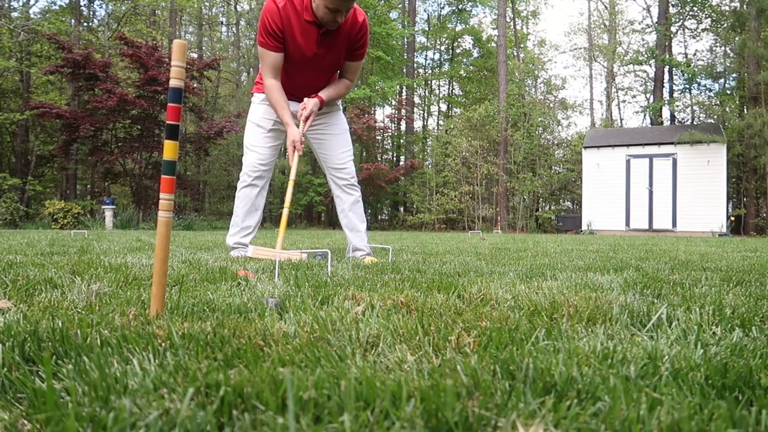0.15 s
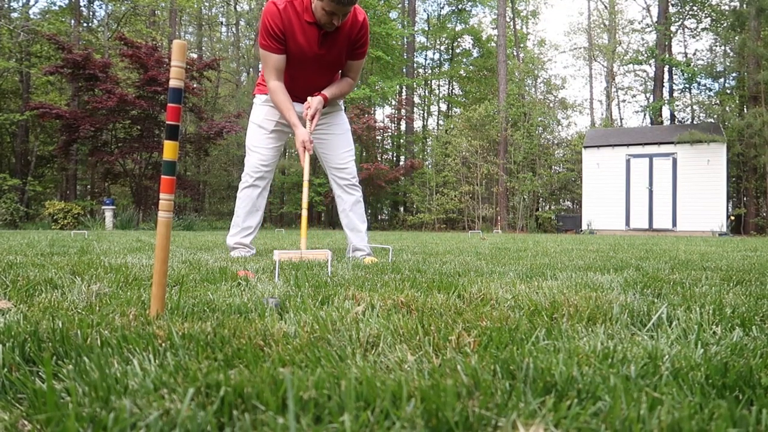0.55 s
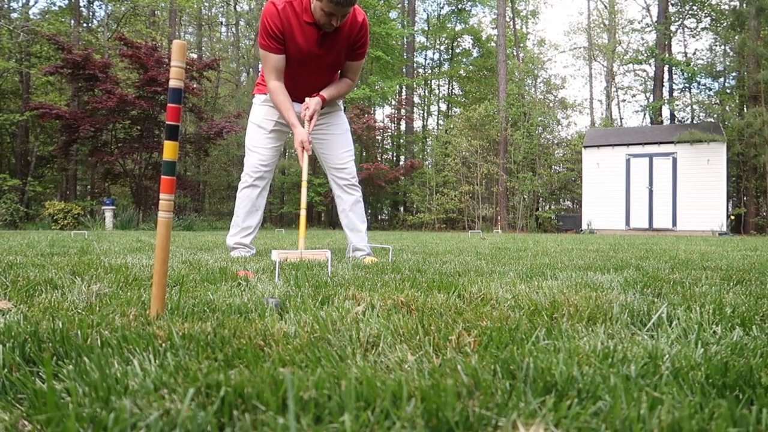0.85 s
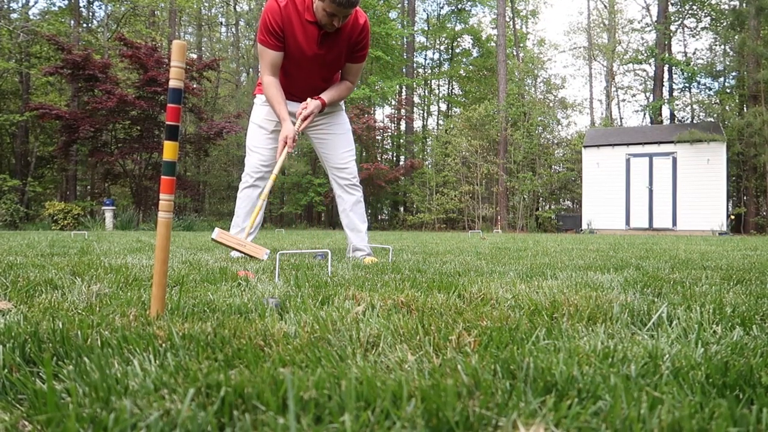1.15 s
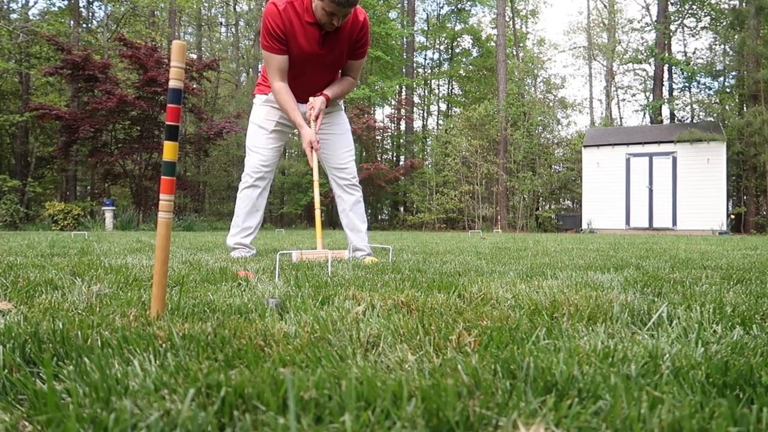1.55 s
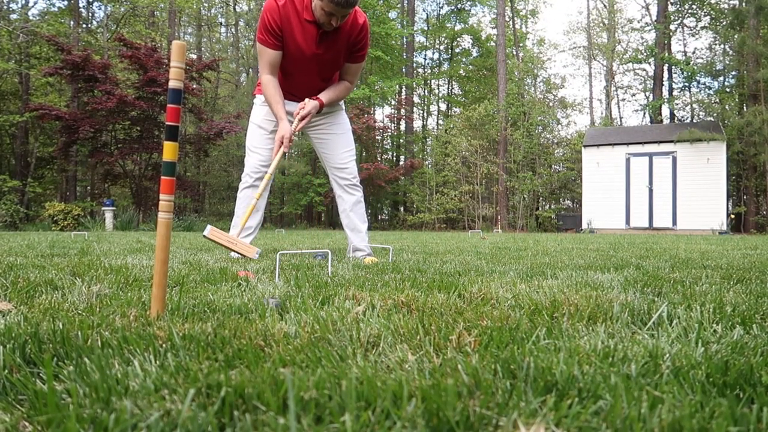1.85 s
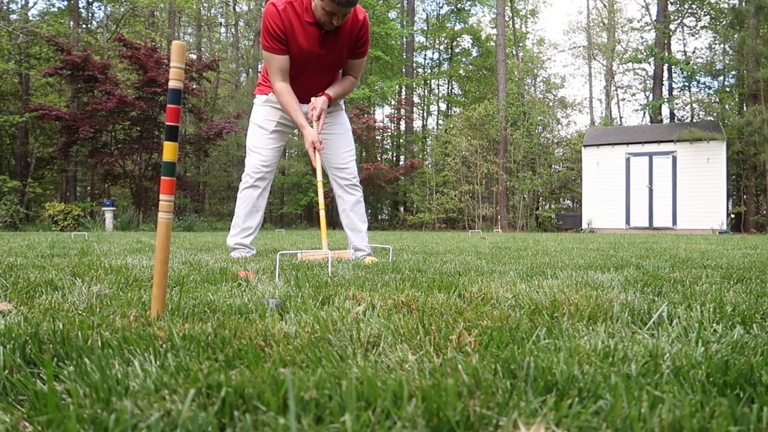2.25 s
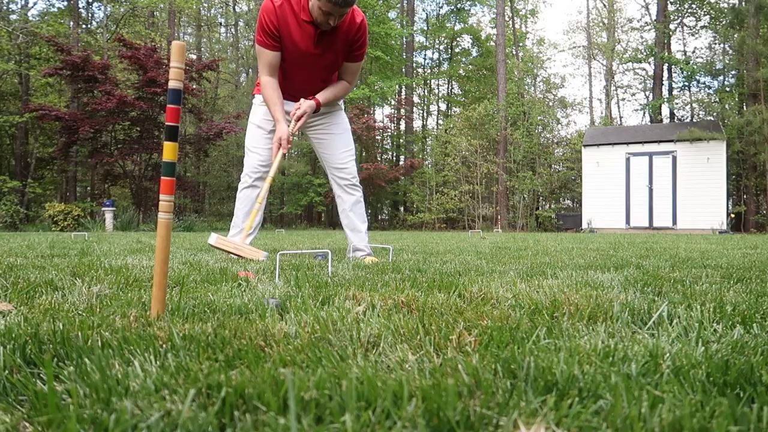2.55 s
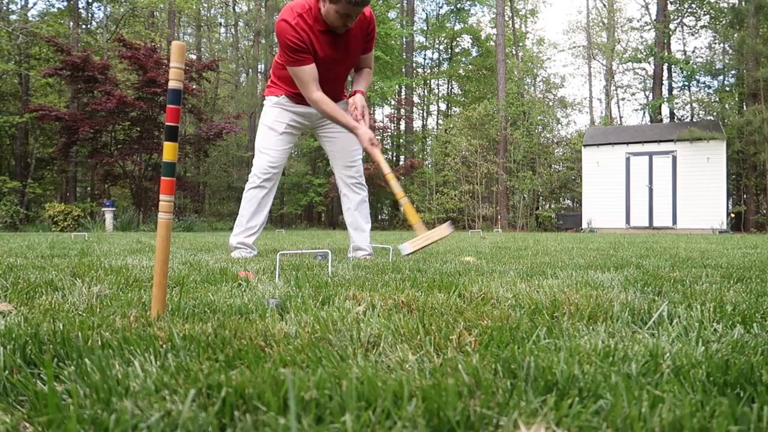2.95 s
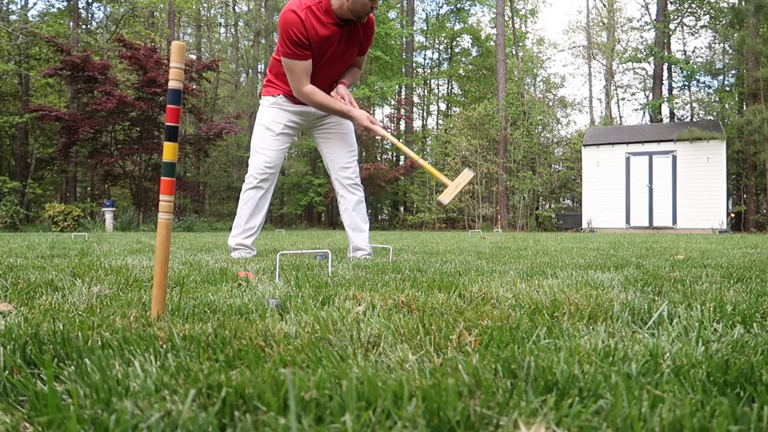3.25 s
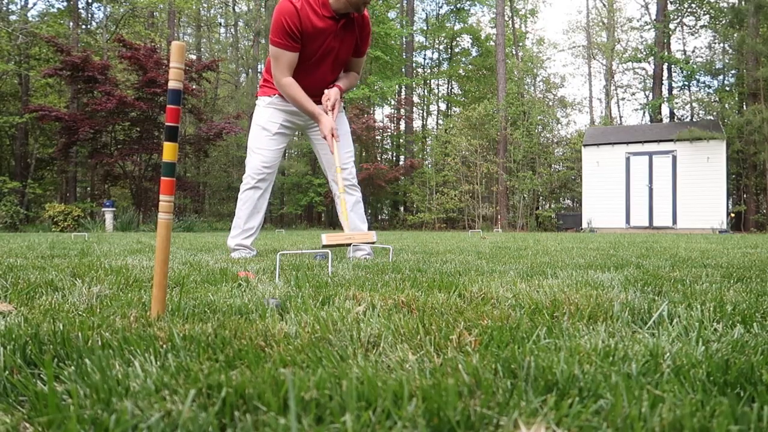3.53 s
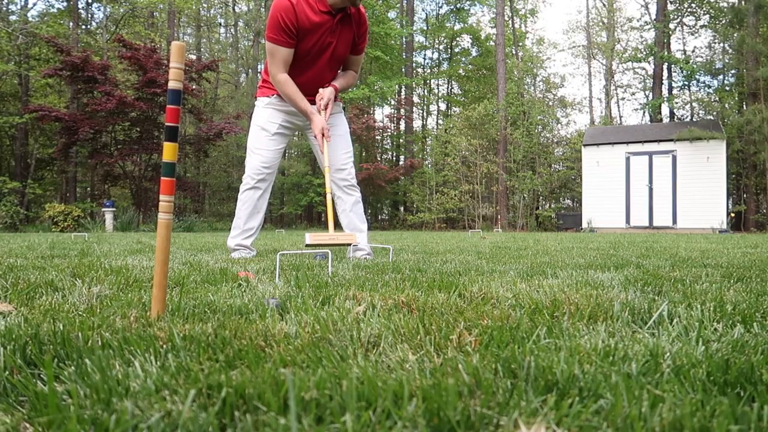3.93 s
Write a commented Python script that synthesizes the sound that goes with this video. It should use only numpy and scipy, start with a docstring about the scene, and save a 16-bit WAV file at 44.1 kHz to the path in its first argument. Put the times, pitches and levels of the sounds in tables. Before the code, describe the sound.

A quiet leafy backyard with faint birdsong, then one sharp wooden mallet knock on a ball, a dull echo, and soft turf thuds.

```python
"""Croquet knock among tall trees

A wooden mallet strikes a ball once: damped wood modes under a crack of bright noise, overloading the microphone.
The surroundings throw the knock back as dull clouds of echoes; the ball drops with short thuds and a grass crunch.
Two small birds repeat phrases of bending tones, and one deeper in the wood calls early on.
Below lie faint brushes of noise, a hush of leaves and a distant rumble, both shaped from noise."""
import sys
import numpy as np
from scipy import signal
from scipy.fft import rfft, irfft
from scipy.io import wavfile

SR = 44100
rng = np.random.default_rng(int(sys.argv[2]) if len(sys.argv) > 2 else 0)


def waveform_to_disk(signal):
    """Save audio, clipped to [-1, 1], as 16-bit WAV at the path in sys.argv[1]."""
    frames = np.transpose(np.atleast_2d(signal))
    scaled = np.clip(frames, -1, 1) * 32767
    samples = np.round(scaled).astype(np.int16)
    wavfile.write(sys.argv[1], SR, samples)


N = 180369
TIME = np.arange(N) / SR


def from_db(db):
    """Decibels to gain."""
    return 10 ** (np.asarray(db) / 20)


def rms_one(x):
    """Scale to rms 1."""
    return x / np.sqrt(np.mean(x ** 2) + 1e-20)


def at_hz(points, hz):
    """Read a spectrum on a log-frequency axis."""
    f, value = np.transpose(points)
    return np.interp(np.log(np.maximum(hz, 1)), np.log(f), value)


def cut(x, hz, kind="low", order=2):
    """Butterworth low- or high-pass."""
    sos = signal.butter(order, min(hz, .45 * SR), kind, fs=SR, output="sos")
    return signal.sosfilt(sos, x + 1e-18)


def click(s):
    """A unit impulse at time s."""
    return 1. * (np.arange(N) == round(s * SR))


def ring(force, hz, t60):
    """A damped mode: a unit click sets a sine of height 1 ringing, down 60 dB after t60 seconds."""
    decay = from_db(-60 / (t60 * SR))
    w = 2 * np.pi * hz / SR
    return signal.lfilter([0, np.sin(w)], [1, -2 * decay * np.cos(w), decay * decay], force + 1e-18)


# How alike the two microphones hear diffuse noise.
# Each row: frequency in Hz, left-right likeness (1 is identical, below 0 plays as 0).
MIC_LIKENESS = [(60, 0.99), (130, 1), (290, 0.58), (640, -0.4), (1410, -0.09), (3100, -0.02), (6820, -0.09),
                (15000, -0.03)]


def stereo_noise(size):
    """White noise at two close microphones, alike in the bass and less so in the treble."""
    mid, side = rfft(rng.standard_normal((2, size)))
    alike = np.clip(at_hz(MIC_LIKENESS, np.fft.rfftfreq(size, 1 / SR)), 0, 1)
    shared = np.sqrt((1 + alike) / 2) * mid
    opposed = np.sqrt((1 - alike) / 2) * side * [[1], [-1]]
    return irfft(shared + opposed, size)


def scattered(x, reflectors):
    """Each group of reflectors returns a dull cloud of echoes that swells and dies."""
    response = 0
    for delay, level_db, rise, t60, edge_hz, width in reflectors:
        age = np.maximum(TIME[:SR] - delay, 0)
        shape = (1 - np.exp(-age / rise)) * from_db(-60 * age / t60)
        mid, side = rng.standard_normal((2, SR)) * shape / np.linalg.norm(shape)
        cloud = mid + width * side * [[1], [-1]]
        response = response + from_db(level_db) * cut(cloud, edge_hz)
    return signal.fftconvolve(x[None], response, axes=1)[:, :N]


def placed(pair, pan_db, lead_s):
    """A source to one side is louder and earlier in the nearer microphone (positive is left)."""
    hz = np.fft.rfftfreq(N, 1 / SR)
    side = np.array([[.5], [-.5]])
    advance = np.exp(2j * np.pi * hz * side * lead_s)
    return irfft(rfft(pair) * from_db(side * pan_db) * advance, N)


# Ringing modes of mallet head and ball.
# Each row: frequency in Hz, relative strength in dB, t60 in seconds.
WOOD_MODES = [(570, -5.5, 0.011), (764, -7, 0.025), (890, -2, 0.012), (1276, -8.5, 0.023),
              (1448, -9, 0.028), (1936, -10, 0.0187), (2027, -16.5, 0.046), (2652, -4, 0.023),
              (3030, -23.5, 0.029), (3350, -9, 0.0057), (4170, -19, 0.036), (5180, -19, 0.015),
              (5970, -17.5, .016), (7300, -16.5, 0.011), (8300, -19.5, 0.016), (9600, -18.5, 0.013),
              (13500, -10.5, .011)]
HIT_S, REBOUND_DELAY_S = 3.0135, .00285
PUSH_DB, PUSH_SOFT_HZ = 0, 5700   # a softer contact has a lower treble edge
REBOUND_DB, REBOUND_SOFT_HZ = -9, 3100


def knock(level_db=2.0, crack_db=-13, crack_t60_s=.028, crack_low_hz=3000, crack_top_hz=8900, radiate_hz=300):
    """Wood meets ball: a push and its rebound ring the modes briefly under a bright crack."""
    push = from_db(PUSH_DB) * cut(click(HIT_S), PUSH_SOFT_HZ, order=1)
    rebound = from_db(REBOUND_DB) * cut(click(HIT_S + REBOUND_DELAY_S), REBOUND_SOFT_HZ, order=1)
    body = np.zeros(N)
    for k, (hz, db, t60) in enumerate(WOOD_MODES):
        swing = (-1) ** k   # neighbouring modes swing in opposite directions
        body += swing * from_db(db) * ring(rebound - push, hz, t60)
    body = cut(body, radiate_hz, "high")   # a small body radiates little bass
    age = TIME - HIT_S
    crack_fade = (age > 0) * from_db(crack_db - 60 * np.abs(age) / crack_t60_s)
    crack = cut(stereo_noise(N), crack_low_hz, "high") * crack_fade
    crack = cut(crack, crack_top_hz, order=1)
    return from_db(level_db) * (body + crack + knock_echoes(body, push))


# Reflecting surroundings of the lawn.
# Each row: delay in seconds, relative level in dB, rise in seconds, t60 in seconds, treble edge in Hz,
# stereo width from 0 to 1.
LAWN_REFLECTORS = [(.006, -9, 0.0035, 0.079, 2630, 0.18), (0.024, -19.5, 0.0048, 0.72, 5450, 0.26),
                   (0.034, -25, .0004, 0.011, 1800, 0.1), (0.102, -25, .012, .22, 4500, 0),
                   (.295, -38, 0.0039, 0.16, 1800, 0)]


def knock_echoes(body, push, ring_out_db=-5, thock_db=27, thock_low_hz=450, thock_top_hz=1300):
    """Each direction hears other modes loudest, so in the echoes they blur into one broad thock."""
    thock = cut(cut(push, thock_low_hz, "high"), thock_top_hz, order=1)
    return scattered(from_db(ring_out_db) * body + from_db(thock_db) * thock, LAWN_REFLECTORS)


# The ball drops on the turf and skips on. Each row: time in seconds, relative strength in dB.
LANDINGS = [(3.1096, -26), (3.119, -35), (3.141, -35.5), (3.335, -38.5)]
# Thud of the ball on turf. Each row: frequency in Hz, relative strength in dB, t60 in seconds.
TURF_MODES = [(282, -18, 0.041), (373, 1.5, 0.031), (587, -12, 0.017)]


def ball(soft_hz=1300, grass_db=4, grass_t60_s=0.067, grass_low_hz=220, grass_top_hz=1000):
    """Soft turf gives a low, short thud, and the blades crunch dully under it."""
    landings = cut(sum(from_db(db) * click(s) for s, db in LANDINGS), soft_hz)
    thuds = sum(from_db(db) * ring(landings, hz, t60) for hz, db, t60 in TURF_MODES)
    crushing = np.zeros(N)
    for s, db in LANDINGS:
        crushing += (TIME > s) * from_db(db - 60 * np.abs(TIME - s) / grass_t60_s)
    blades = cut(cut(crushing * rng.standard_normal(N), grass_low_hz, "high"), grass_top_hz)
    return thuds + from_db(grass_db) * blades


def whistle(notes, waver=0.013, waver_hz=150):
    """Each note is a near-pure tone that bends through three pitches and wavers a little."""
    out = np.zeros(N)
    wobble = 1 + waver * rms_one(cut(rng.standard_normal(N), waver_hz))
    for s, length, first, middle, last, db in notes:
        on = (TIME >= s) & (TIME < s + length)
        u = (TIME[on] - s) / length   # progress through the note, 0 to 1
        bend = np.polyfit([0, .5, 1], [first, middle, last], 2)
        hz = np.polyval(bend, u) * wobble[on]
        out[on] += from_db(db) * np.sin(np.pi * u) * np.sin(2 * np.pi * np.cumsum(hz) / SR)
    return out


def song(phrases, notes):
    """The same phrase again and again, louder or softer: rows of notes in absolute time."""
    return [(start + s, *shape, level + db) for start, level in phrases for s, *shape, db in notes]


# Trunks and leaves that echo the birdsong.
# Each row: delay in seconds, relative level in dB, rise in seconds, t60 in seconds, treble edge in Hz,
# stereo width from 0 to 1.
WOOD_REFLECTORS = [(.003, -3.5, 0.0012, 0.18, 6100, 0.06), (0.045, -4, 0.0074, 1, 5800, 0)]


def in_the_wood(voice, wet_db, pan_db=0, lead_s=0, leaves_hz=2300):
    """The leaves throw back a bird's high notes best; voice and echoes sit at one place."""
    echoes = scattered(cut(voice, leaves_hz, "high"), WOOD_REFLECTORS)
    return placed(voice + from_db(wet_db) * echoes, pan_db, lead_s)


# Notes of the whistler's phrase. Each row: start in seconds into the phrase, length in seconds,
# first, middle and last pitch in Hz, level in dB relative to the phrase.
WHISTLER_PHRASE = [(0, 0.0454, 2150, 2392, 2380, -1.5), (0.027, 0.0225, 2326, 1924, 1560, -6),
                   (0.095, 0.045, 2550, 2752, 2766, -2.5), (0.14, 0.036, 2690, 2564, 2635, -1.5),
                   (.194, 0.0574, 3820, 4014, 4077, -6.5), (0.281, 0.031, 3670, 3245, 2880, -3.5)]
# Each row: phrase start in seconds, level in dB.
WHISTLER_STARTS = [(1.76, -43.5), (2.14, -39), (2.527, -38), (2.908, -38), (3.29, -43)]


def whistler(stops_s=3.35):
    """A bird left of centre repeats its whistled phrase, breaking off in the last one."""
    notes = [note for note in song(WHISTLER_STARTS, WHISTLER_PHRASE) if note[0] < stops_s]
    return in_the_wood(whistle(notes), wet_db=2, pan_db=3, lead_s=65e-6)


# Notes of the warbler's phrase, which opens with a thin peep. Each row: start in seconds into the phrase,
# length in seconds, first, middle and last pitch in Hz, level in dB relative to the phrase.
WARBLER_PHRASE = [(0, .016, 5400, 5180, 5040, -13), (0.041, 0.018, 3523, 3070, 3130, 1),
                  (0.08, 0.0233, 3880, 3976, 4900, -2.5), (0.131, .034, 2660, 2447, 1740, -0.5),
                  (0.203, 0.0286, 3100, 2936, 2700, -2.5), (.243, 0.032, 2367, 2330, 2358, -1.5),
                  (.275, 0.031, 2470, 2770, 2970, 1.5)]
# Each row: phrase start in seconds, level in dB.
WARBLER_STARTS = [(2.357, -47.5), (2.701, -42.5), (3.043, -43), (3.385, -42), (3.738, -40.5)]


def warbler():
    """A bird right of centre repeats a quick run of bending tones."""
    return in_the_wood(whistle(song(WARBLER_STARTS, WARBLER_PHRASE)), wet_db=1, pan_db=-3, lead_s=-56e-6)


# Calls from deeper in the wood. Each row: start in seconds, middle pitch in Hz, level in dB.
DEEP_WOOD_CALLS = [(0, 2590, -64.5), (0.131, 2763, -61.5), (.17, 2580, -63), (.4, 2545, -63.5),
                   (.74, 2200, -63.5)]


def far_bird(length_s=0.067, arch=.03):
    """A third bird repeats one arched note, both ends below its middle pitch, drenched in echoes."""
    notes = []
    for s, hz, db in DEEP_WOOD_CALLS:
        end_hz = hz * (1 - arch)
        notes.append((s, length_s, end_hz, hz, end_hz, db))
    return in_the_wood(whistle(notes, waver=0.016), wet_db=9)


# Grass and clothing brush faintly.
# Each row: loudest moment in seconds, relative level in dB, swell and fade time in seconds each.
BRUSHES = [(0.627, -60.5, 0.006), (.93, -65, .008), (3.347, -63, 0.036)]


def rustles(low_hz=1200, top_hz=5000):
    """Brief soft brushes of band-limited noise."""
    touch = sum(from_db(db) * np.exp(-((TIME - s) / length) ** 2) for s, db, length in BRUSHES)
    return touch * rms_one(cut(cut(stereo_noise(N), low_hz, "high"), top_hz, order=1))


# Spectrum of the outdoor air. Each row: frequency in Hz, relative level per Hz in dB.
AIR_SPECTRUM = [(15, -57), (25, -13), (55, 0.5), (193, -5.5), (331, -14.5), (368, -12), (410, -15),
                (482, -13.5), (567, -19), (919, -20.5), (2010, -24.5), (2560, -25.5), (3090, -27),
                (12200, -42.5), (15500, -55)]
# Bass level over time, ducked by the recorder after the knock; only its movement about the mean is heard.
# Each row: time in seconds, level in dB.
BASS_LEVEL = [(0.0, -49), (1.24, -50.5), (2.94, -51), (3.23, -54), (3.53, -54), (3.85, -51), (4.09, -52)]


def air(hush_db=-47, bass_hz=300, bass_db=-1):
    """A hush of leaves over a far rumble, its bass turned down after the knock as the recorder's gain
    ducks, then partly restored."""
    color = from_db(at_hz(AIR_SPECTRUM, np.fft.rfftfreq(N, 1 / SR)))
    hush = from_db(hush_db) * rms_one(irfft(rfft(stereo_noise(N)) * color, N))
    level = np.interp(TIME, *np.transpose(BASS_LEVEL))
    bass_gain = from_db(bass_db + level - level.mean())
    return hush + (bass_gain - 1) * cut(hush, bass_hz, order=1)   # only the bass moves


def scene(knock_tilt_db=0.4):
    """The lawn with everything on it, the knock raised on the left and lowered on the right."""
    strike = knock() * from_db([[knock_tilt_db], [-knock_tilt_db]])
    birds = whistler() + warbler() + far_bird()
    return strike + ball() + birds + rustles() + air()


def gain_control(x, threshold_db=-4, recovery_db_per_s=5, attack_hz=8):
    """A loud peak turns the gain down a little; it creeps back."""
    over = np.maximum(20 * np.log10(np.abs(x).max(axis=0) + 1e-9) - threshold_db, 0)
    recovered = recovery_db_per_s * TIME
    held = np.maximum.accumulate(over + recovered) - recovered
    return x * from_db(-cut(held, attack_hz, order=1))


def record(dry, stop_hz=16700):
    """The loudest peaks are flattened, the gain ducks after them, and the top is cut."""
    flattened = dry / (1 + dry ** 6) ** (1 / 6)
    top_cut = signal.cheby2(12, 60, stop_hz, fs=SR, output="sos")   # 60 dB down from stop_hz
    return signal.sosfilt(top_cut, gain_control(flattened))


dry = scene()
out = record(dry)
waveform_to_disk(out)
```